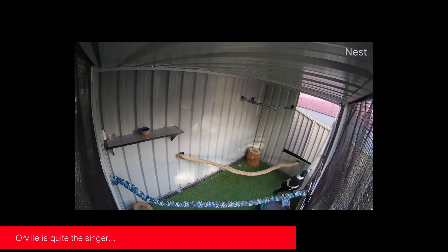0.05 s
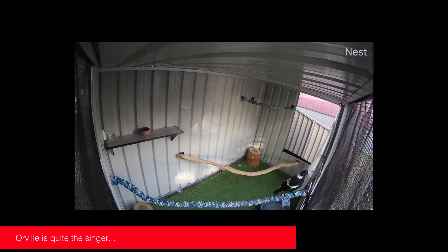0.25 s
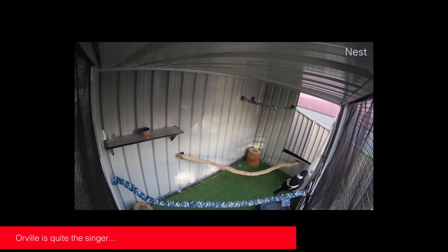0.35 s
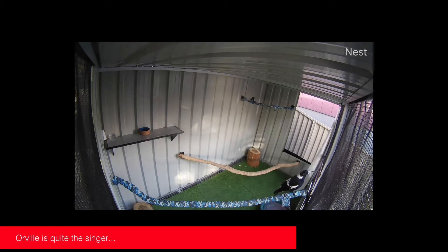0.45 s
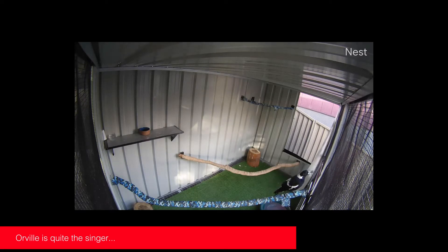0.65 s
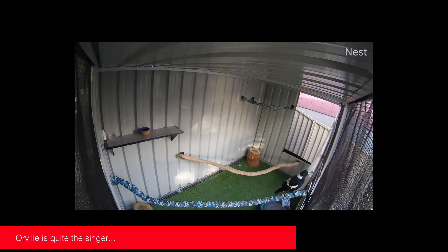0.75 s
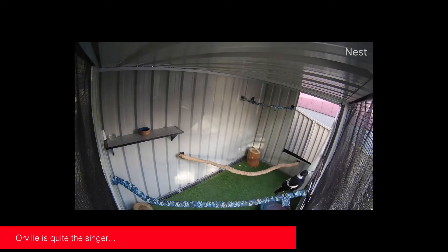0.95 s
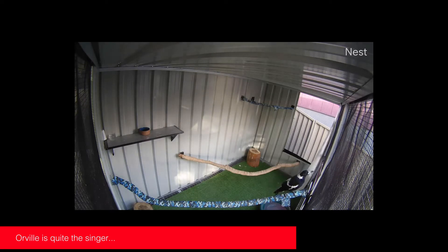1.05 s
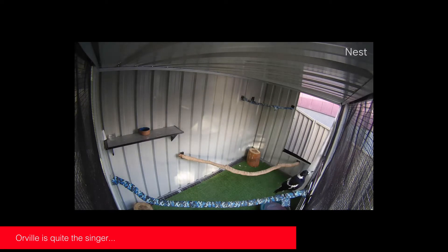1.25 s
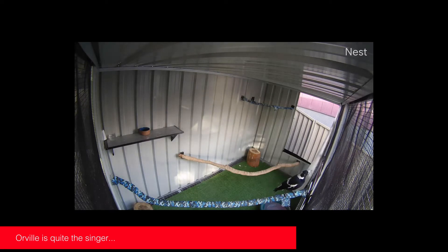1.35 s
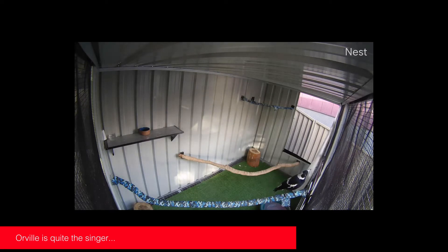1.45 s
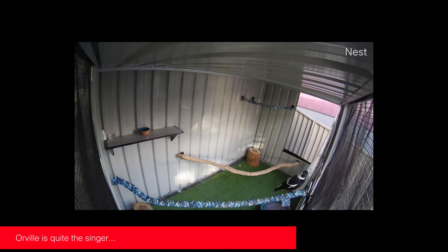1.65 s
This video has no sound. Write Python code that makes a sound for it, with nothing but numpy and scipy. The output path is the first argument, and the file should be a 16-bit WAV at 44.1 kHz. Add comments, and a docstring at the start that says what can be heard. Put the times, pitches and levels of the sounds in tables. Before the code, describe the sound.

A magpie carols inside a sheet-metal aviary. Quick overlapping whistles with brief throaty rasps lead into one long falling glide, then a last run of notes fades. The walls ring slightly over a faint background.

```python
"""A magpie carols in a sheet-metal aviary, over a faint background.
The two sides of its syrinx whistle short overlapping notes, clean or raspy, which beat where they meet.
Hiss rides on the song, and the metal walls ring after it. Bursts of throat rasp break in, then comes
one long falling glide. A last run of notes follows, its final pitch swelling again and again as it dies."""
import sys
import numpy as np
from scipy import signal
from scipy.fft import rfft, irfft
from scipy.io import wavfile

SR = 44100
rng = np.random.default_rng(int(sys.argv[2]) if len(sys.argv) > 2 else 0)


def to_wav(s):
    """Save 16-bit WAV."""
    ch = np.atleast_2d(s).T  # columns
    pcm = np.round(np.clip(ch, -1, 1) * 32767)  # PCM
    wavfile.write(sys.argv[1], SR, pcm.astype(np.int16))


N = 74970
T = np.arange(N) / SR
FREQS_HZ = np.fft.rfftfreq(N, 1 / SR)


def amp(db):
    """Decibels to gain."""
    return 10 ** (np.asarray(db) / 20)


def curve_at(points, hz):
    """Reads a curve on a log-frequency axis."""
    points_hz, values = np.transpose(points)
    return np.interp(np.log(hz + 1), np.log(points_hz + 1), values)


def shaped_noise(gains):
    """White noise shaped by a gain at each frequency, scaled to rms 1."""
    x = irfft(rfft(rng.standard_normal(N)) * gains, N)
    return x / np.sqrt(np.mean(x ** 2) + 1e-20)


def wobble(rate_hz):
    """Random motion that rolls off above the given rate."""
    return shaped_noise((FREQS_HZ / rate_hz) ** .5 * np.exp(-(FREQS_HZ / rate_hz) ** 2))


def stretch(motion, count):
    """A random stretch of a motion."""
    return np.roll(motion, rng.integers(N))[:count]


SHAKE, FRAYING, TURBULENCE = wobble(rate_hz=262), wobble(rate_hz=106), wobble(rate_hz=134)


def background():
    """A faint, steady bed of noise, strongest in the mids."""
    # colour of the bed: frequency_hz, relative_db
    bed_colour = [(20, -10), (45, -10), (120, 2), (400, 1), (900, 16), (2000, -12.5), (4800, -6),
                  (7500, -27.5), (14000, -30.5)]
    return amp(-79.5) * shaped_noise(amp(curve_at(bed_colour, FREQS_HZ)))


def syrinx(hz, level, overtone_level, roughness):
    """One vibrating membrane, shaken in pitch and strength when rough: [fundamental, overtones]."""
    # overtones 2 to 11, the fourth partial standing out: gain_db
    partials_db = [-5, -2.5, 1, -7, -7, -10, -5.5, -4, -7, -2]
    # filter of the throat and beak on the overtones: frequency_hz, gain_db
    throat_eq = [(1350, 0.5), (1900, -13), (2700, -7), (3300, -11), (3800, -5), (4450, -3.5), (5100, -12),
                 (5650, -9.5), (6100, -38.5), (6750, -24.5), (7800, -45.5), (10000, -40), (11700, -33.5),
                 (12900, -42)]
    jitter_depth, flutter_depth, fray_rad = 0.081, 0.55, 0.23  # at full roughness
    fuzz_depth = 0.26
    live = level > amp(-105)
    count = np.count_nonzero(live)
    shaken_hz = hz[live] * (1 + jitter_depth * roughness * stretch(SHAKE, count))
    flutter = 1 + flutter_depth * roughness * stretch(SHAKE, count)
    phase = 2 * np.pi * np.cumsum(shaken_hz) / SR
    # overtones are less steady than the fundamental
    frayed_phase = phase + fray_rad * np.sqrt(roughness) * stretch(FRAYING, count)
    overtones = np.zeros(count)
    for k, gain_db in enumerate(partials_db, 2):
        fuzz = 1 + fuzz_depth * stretch(TURBULENCE, count)  # spreads the overtone into a narrow band
        overtones += amp(gain_db + curve_at(throat_eq, k * shaken_hz)) * fuzz * np.sin(k * frayed_phase)
    voice = np.zeros((2, N))
    voice[0, live] = level[live] * np.sin(phase) * flutter
    voice[1, live] = overtone_level[live] * overtones * flutter
    return np.sqrt(2) * voice


def carol():
    """Short sliding whistles from the syrinx; each swells, stops and lingers between the walls."""
    # the song: start_s, length_s, first_pitch_hz, last_pitch_hz, level_db, overtones_db (relative),
    # roughness (0-1)
    song_notes = [ (-.02, 0.059, 996, 1043, -59.5, -29.5, 0.88),
                  (0.085, 0.057, 819, 808.6, -53.5, -15, 0.48),
                  (0.134, 0.046, 1145, 1193, -57.5, -12.5, 0.29),
                  (0.153, .022, 1530, 1518, -47.5, -25, 0.48), (0.184, 0.032, 1033, 1025, -57.5, -21, 0.3),
                  (0.207, 0.099, 700.7, 665.2, -49, -21, 0.07), (.245, 0.11, 1022, 1088, -67, -26, 0.1),
                  (0.327, 0.064, 929, 922, -50, -29, 0.48), (0.339, 0.054, 1265, 1248, -54.5, -33.5, 0.27),
                  (0.386, 0.064, 1277, 1282, -67, -25.5, 0.25),
                  (0.443, 0.034, 660, 640, -54.5, -36.5, 0.35), (0.465, 0.033, 762, 815, -50, -12.5, 0.3),
                  (0.484, 0.02, 1556, 1545, -38, -21, .1), (0.502, 0.027, 1555, 1578, -46.5, -6, 0.03),
                  (0.528, .04, 1099, 1253, -49.5, -21, 0.9), (.524, 0.019, 707, 680, -56.5, -24, .4),
                  (0.554, 0.055, 1099, 1078, -43, -22, 0), (0.557, .04, 958, 957.7, -43, -12, 0.37),
                  (0.584, 0.055, 942.5, 922.5, -37.5, -10.5, 0.05), (0.63, 0.048, 916, 928, -43, -21, 0.1),
                  (0.661, 0.06, 1272, 1404, -55.5, -15, .2), (0.706, 0.023, 1490, 1480, -36.5, -12.5, 0.2),
                  (0.722, 0.035, 1095, 1079, -42.5, -21, 0.2), (0.749, 0.076, 765, 742, -46, -21, 0.06),
                  (0.823, 0.057, 1066, 1036, -45.5, -10, 0.3),
                  (0.831, 0.023, 1537, 1492, -46.5, -17.5, 0.33), (0.85, 0.035, 1252, 1260, -47.5, -3, 0.4),
                  (0.87, 0.11, 1020, 1003, -59, -23, 0.31), (1.233, 0.081, 757, 741, -51, -18.5, 0.15),
                  (1.251, 0.07, 826, 830.6, -46.5, -21, 0.17), (1.251, 0.068, 1570, 1536, -65, -18, 0),
                  (1.321, 0.023, 1536, 1525, -36.5, -16, 0), (1.333, .028, 1524, 1558, -43.5, -15, 0.02),
                  (1.334, 0.038, 1136, 1107, -38.5, -21, 0.13), (1.359, 0.045, 1124, 1091, -35, -22, 0.05),
                  (1.394, 0.041, 1108, 1119, -48.5, -13, 0), (1.442, 0.049, 1124, 1103, -46, -42, 0.01),
                  (1.484, 0.032, 1105, 1114, -58, -11, 0), (1.544, 0.074, 1106, 1101, -66.5, -30, 0), ]
    attack_s, release_s = 0.016, 0.02
    ring_db, ring_t60_s = -14.5, 0.29
    song = np.zeros((2, N))
    for start_s, length_s, first_hz, last_hz, level_db, overtones_db, roughness in song_notes:
        t = T - start_s
        rise = np.sin(np.pi / 2 * np.clip(t / attack_s, 0, 1)) ** 2
        fall = np.sin(np.pi / 2 * np.clip((length_s - t) / release_s + .25, 0, 1)) ** 2
        ring = amp(ring_db - 60 * np.maximum(t - length_s, 0) / ring_t60_s)
        level = amp(level_db) * rise * (fall + (1 - fall) * ring)
        hz = first_hz + (last_hz - first_hz) * np.clip(t / length_s, 0, 1)
        song += syrinx(hz, level, level * amp(overtones_db), roughness)
    return song


def hiss():
    """Wide, fluttering hiss that swells with the song and sets the wall sheets ringing."""
    # colour of the hiss: frequency_hz, relative_db
    hiss_colour = [(20, -17.5), (40, 4), (120, 0.5), (300, 2.5), (600, 5), (1200, 8), (1900, 2.5),
                   (2900, 0.5), (3900, -3), (4700, 1.5), (5050, -6), (5600, -10), (6100, -27), (6700, -18),
                   (7700, -36.5), (10000, -39), (12000, -30), (13000, -41)]
    # its swells, ahead of the trim: time_s, level_db
    hiss_swells = [(0, -74.5), (.087, -80), (.102, -65.5), (.17, -66.5), (.22, -74), (.325, -77.5),
                   (.365, -62.5), (.41, -75.5), (.46, -81.5), (.495, -62.5), (.55, -68), (.605, -59),
                   (.665, -74), (.70, -66.5), (.722, -62), (.77, -68), (.825, -68), (.84, -60),
                   (.866, -59.5), (.9, -65), (.915, -70.5), (1.08, -69), (1.16, -65), (1.205, -59),
                   (1.25, -68.5), (1.315, -65.5), (1.34, -63.5), (1.4, -62.5), (1.48, -76), (1.7, -85)]
    # resonances of the wall sheets: centre_hz, width_hz, gain_db
    sheet_modes = [(960, 140, 9.5), (1290, 17, 1.5), (1990, 20, 5), (2323, 24, 9.5), (2720, 60, 8.5),
                   (3050, 100, 7.5), (3510, 94, 7.5), (3500, 170, 2.5), (3740, 60, 8), (4080, 21, 8),
                   (4360, 56, 3), (4500, 180, 6.5), (4684, 63, 7.5), (4900, 22, 5.5), (5820, 90, 6.5)]
    trim_db, flutter_db = -2.5, 2
    swell_db = np.interp(T, *np.transpose(hiss_swells))
    air = shaped_noise(amp(curve_at(hiss_colour, FREQS_HZ)))
    air *= amp(trim_db + swell_db + flutter_db * wobble(rate_hz=90))
    ringing = np.zeros(N)
    for centre_hz, width_hz, gain_db in sheet_modes:
        resonator = signal.iirpeak(centre_hz, centre_hz / width_hz, SR)
        ringing += (amp(gain_db) - 1) * signal.lfilter(*resonator, air)
    return air + ringing


def aviary(sound, decay_curve):
    """Dense reflections from the metal walls, each band dying at its own speed."""
    hz, t, bands = signal.stft(rng.standard_normal(SR), SR, nperseg=256)
    t60_s = curve_at(decay_curve, hz)[:, None]
    tail = signal.istft(bands * amp(-60 * t / t60_s), SR, nperseg=256)[1]
    return signal.fftconvolve(sound, tail / np.linalg.norm(tail))[:N]


def throat_rasps():
    """Short bursts of turbulence, each in one resonance of the bird's throat."""
    # the bursts: peak_s, half_length_s, centre_hz, half_width_hz, level_db
    rasp_bursts = [ (0.6, 0.02, 3890, 297, -51.5), (0.601, .03, 3250, 350, -61.5),
                   (.605, 0.025, 11750, 900, -84.5), (0.609, .025, 7750, 700, -83),
                   (0.609, 0.022, 5250, 504, -62), (0.711, .011, 2180, 60, -67.5),
                   (0.719, 0.013, 3800, 220, -61.5), (0.86, .024, 3000, 300, -54),
                   (0.865, 0.0087, 4040, 110, -48), (0.869, 0.026, 5900, 600, -66),
                   (0.871, .02, 10700, 1800, -83.5), (0.88, 0.03, 3750, 200, -52.5),
                   (1.204, .022, 4130, 131, -54.5), (1.204, 0.024, 11590, 247, -86),
                   (1.386, 0.064, 3356, 68.7, -62.5), (1.389, .05, 11500, 200, -94.5),
                   (1.552, 0.037, 4400, 1000, -72), ]
    rasps = np.zeros(N)
    for peak_s, half_length_s, centre_hz, half_width_hz, level_db in rasp_bursts:
        band = shaped_noise(1 / (1 + ((FREQS_HZ - centre_hz) / half_width_hz) ** 4))
        swell = np.exp(-((T - peak_s) / half_length_s) ** 2)
        rasps += amp(level_db) * swell * band
    return rasps


def glide():
    """A long falling whistle; a second line trails just above it and beats with it."""
    # lower and upper line: time_s, pitch_hz, level_db, overtones_db (relative)
    low_line = [(.905, 1311, -67, -15.5), (.92, 1323, -48.5, -14), (.97, 1303, -48, -14),
                (1.01, 1275, -54, -5), (1.055, 1245, -40.5, -14), (1.08, 1177, -53.5, -7),
                (1.10, 1125, -50, -5.5), (1.165, 1066, -45, -10), (1.205, 1055, -45.5, -4.5),
                (1.23, 1050, -47.5, -19.5), (1.25, 1076, -62, -18.5)]
    high_line = [(1.07, 1233, -72.5, -19), (1.10, 1243, -51.5, -28.5), (1.14, 1185, -50, -14.5),
                 (1.18, 1112, -45.5, -3), (1.21, 1124, -48.5, -20), (1.28, 1088, -62.5, -4.5)]
    fade_s = 0.016
    whistle = np.zeros((2, N))
    for line in (low_line, high_line):
        time_s, pitch_hz, level_db, overtones_db = np.transpose(line)
        inside_s = np.minimum(T - time_s[0], time_s[-1] - T)
        level = amp(np.interp(T, time_s, level_db)) * np.clip(inside_s / fade_s + 1, 0, 1)
        overtone_level = level * amp(np.interp(T, time_s, overtones_db))
        whistle += syrinx(np.interp(T, time_s, pitch_hz), level, overtone_level, roughness=0.1)
    return whistle


def scene():
    """The bird, the aviary's reverb and the background, in mono."""
    # decay of the overtones off the walls, and of the whole room: frequency_hz, t60_s
    bounce_decay = [(2000, .33), (6000, 0.22)]
    room_decay = [(100, 0.91), (1000, 0.28), (4000, 0.15), (10000, 0.1)]
    treble_db, reverb_db = -3.5, -14
    fundamentals, overtones = carol() + glide()
    # the beak beams the overtones at the walls: equal parts direct and reflected
    treble = amp(treble_db) * (overtones + aviary(overtones, bounce_decay))
    bird = fundamentals + treble + hiss() + throat_rasps()
    reverb = amp(reverb_db) * aviary(bird, room_decay)
    return (bird + reverb + background())[None]


def record(dry):
    """A steep low-pass takes off the very top."""
    cutoff_hz = 15000
    taps = signal.firwin(511, cutoff_hz, window=("kaiser", 9), fs=SR)
    return signal.oaconvolve(dry, taps[None], "same")


dry = scene()
out = record(dry)
to_wav(out)
```